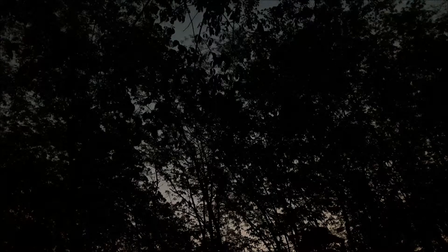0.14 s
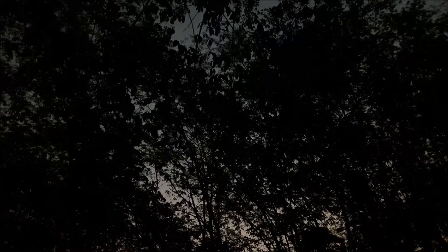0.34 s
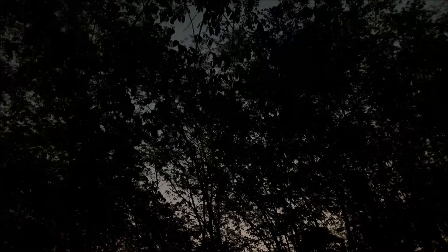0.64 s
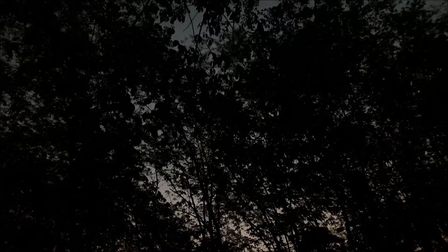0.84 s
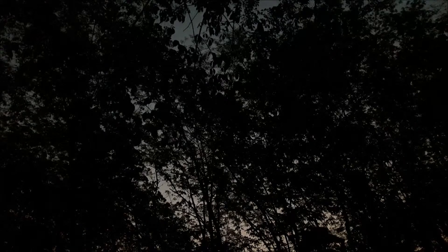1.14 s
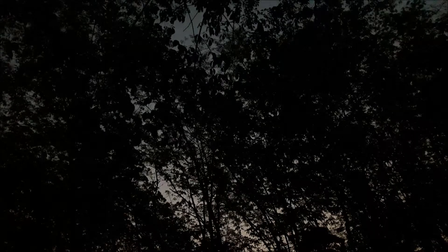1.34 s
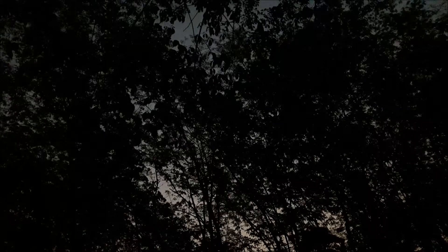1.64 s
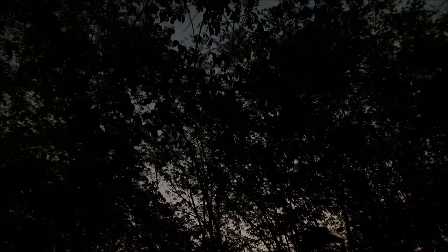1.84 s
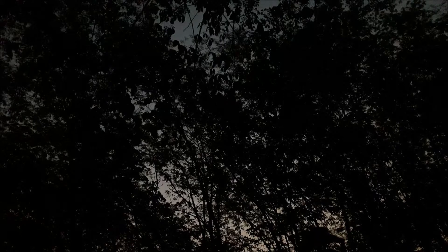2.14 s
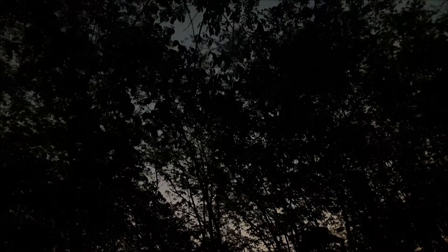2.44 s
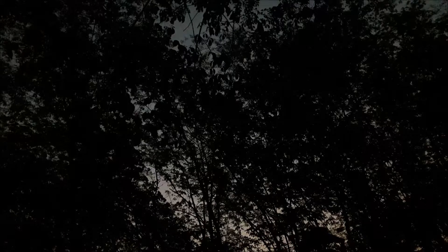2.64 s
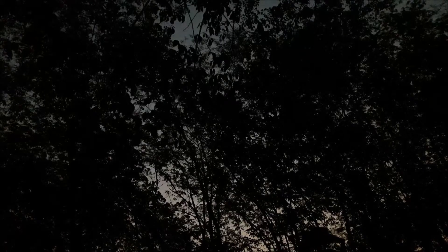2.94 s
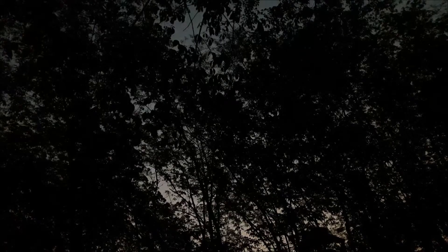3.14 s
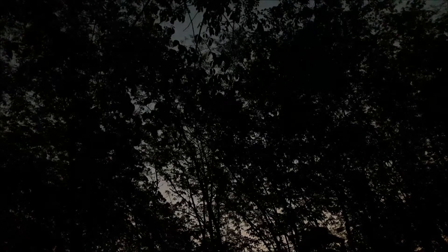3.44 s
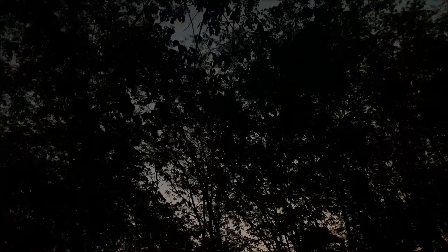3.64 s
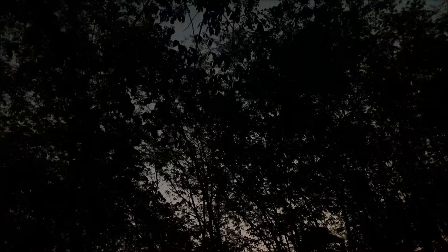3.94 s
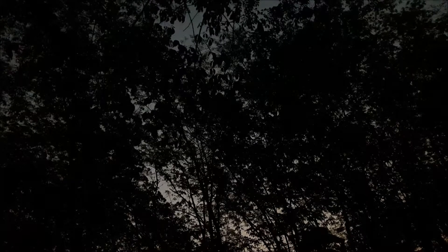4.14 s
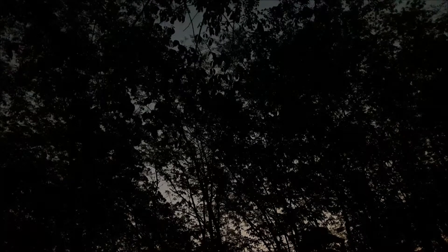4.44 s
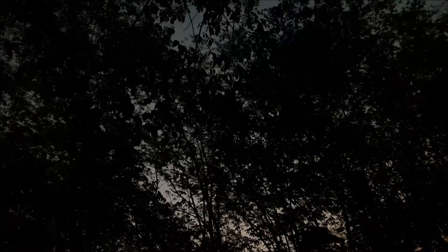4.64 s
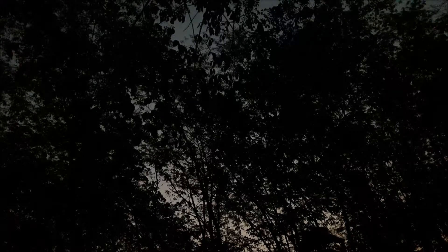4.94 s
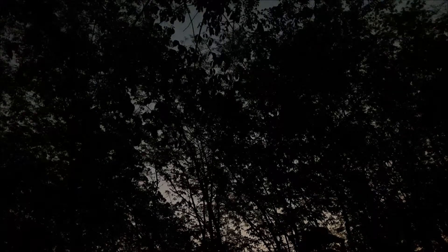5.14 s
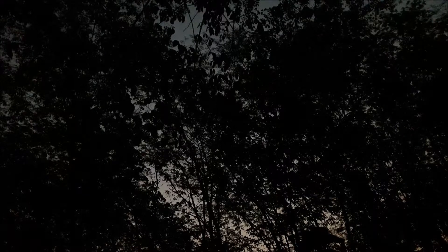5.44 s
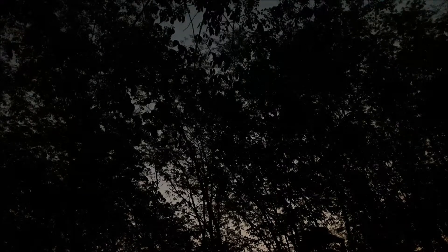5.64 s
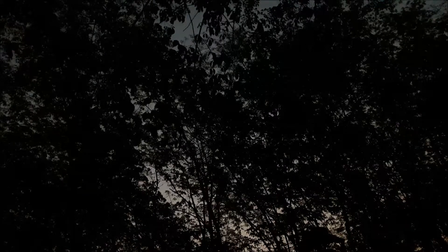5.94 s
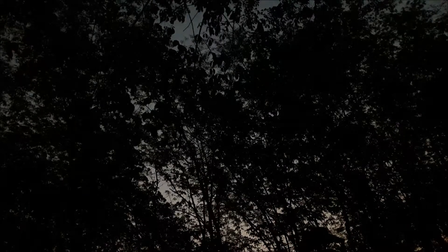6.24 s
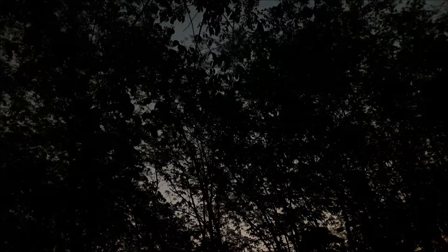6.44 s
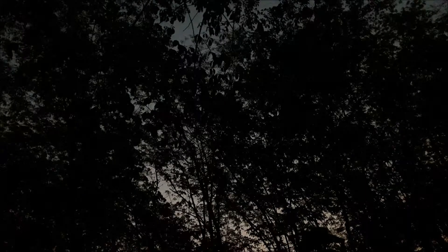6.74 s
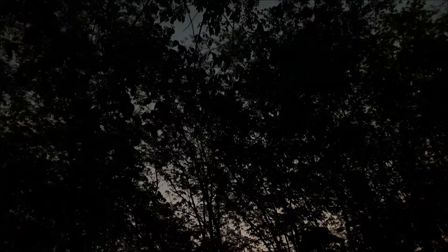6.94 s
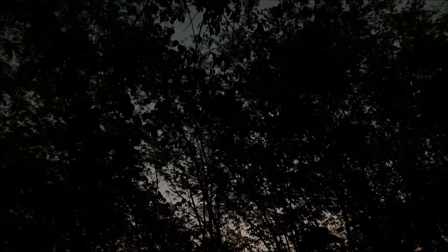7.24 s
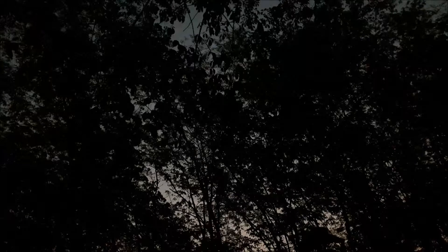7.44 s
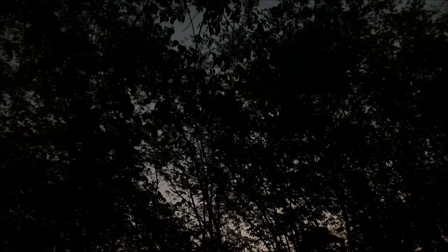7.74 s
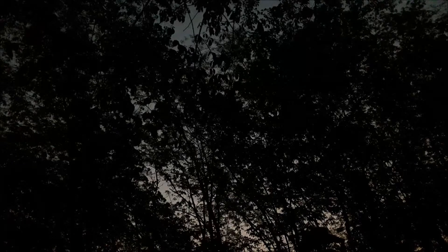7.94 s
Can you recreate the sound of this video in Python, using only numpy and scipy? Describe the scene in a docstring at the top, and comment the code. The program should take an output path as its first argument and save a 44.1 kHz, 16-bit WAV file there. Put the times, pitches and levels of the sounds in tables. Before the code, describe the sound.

One microphone among dark trees hears a treetop koel repeat a smooth rising whistle five times, each ending in a quick fall and a soft, scattered echo. Thin, dense insect hiss and faint low rumble continue throughout, with a far engine throbbing at first, then droning. Small dry ticks snap nearby; after the last call a blurred distant cock crow fades and light rustles brush past.

```python
"""In a forest at dawn a koel calls five times from a treetop: a near-pure whistle that dips, climbs and falls.
Each call is a gliding sine with faint overtones; decaying noise echoes stand for scattering trunks and leaves.
Far off, a cock crows and another bird whistles as gliding tones, mostly echo, and an engine drones at low pitch.
Filtered noise makes the steady insect hiss and the air of the place.
Close to the one microphone, short noise bursts make a few ticks and soft rustles."""
import sys
import numpy as np
from scipy import signal
from scipy.fft import rfft, irfft
from scipy.io import wavfile
from scipy.ndimage import uniform_filter1d

SR = 44100
rng = np.random.default_rng(int(sys.argv[2]) if len(sys.argv) > 2 else 0)


def log_audio(samples):
    """Write samples as a 16-bit WAV file to the path given in sys.argv[1]."""
    # one column per channel
    frames = np.atleast_2d(samples).T
    # limit to full scale, then quantise
    limited = np.clip(frames, -1, 1)
    pcm = np.round(limited * 32767).astype(np.int16)
    wavfile.write(sys.argv[1], SR, pcm)


N = 357210
TIME = np.arange(N) / SR

# the koel's calls, before their way to the microphone: (start [s], attack time constant [s],
# climb begins after [s], fall begins after [s], low note [Hz], high note [Hz], level [dB], overtone boost [dB])
KOEL_CALLS = [(0.446, 0.052, 0.14, 0.39, 1308, 1640, -30, 1),
              (1.636, 0.032, .120, .376, 1361, 1662, -29.5, 3),
              (3.008, 0.036, 0.14, 0.39, 1302, 1644, -30.5, 3.5),
              (4.487, 0.061, .143, .396, 1313, 1653, -30.5, 3),
              (5.827, 0.046, .125, .382, 1338, 1654, -29.5, 3.5)]
# the whistle's overtones, before any boost: (multiple of the pitch, on the low note [dB], on the high note [dB])
KOEL_OVERTONES = [(2, -44, -33), (3, -54, -47.5), (4, -49, -42), (5, -41, -51.5), (6, -64.5, -61.5),
                  (7, -59.5, -50), (8, -66, -64.5), (9, -64.5, -59)]
# breathy edge at the start of each call: (frequency [Hz], relative density [dB per Hz])
CATCH_COLOUR = [(1000, -26), (1300, 4), (1750, -4), (2000, -15.5), (2750, -18), (3000, -39.5)]
# ground and branch paths that add up at some pitches and cancel at others: (frequency [Hz], gain [dB])
PATH_RESPONSE = [(800, 1), (1050, 0.5), (1130, 4), (1215, -7.5), (1300, -1.6), (1345, 3), (1420, 0.5),
                 (1540, -1), (1640, 1.6), (1800, -4.5), (16000, -7.5)]
# scattering by the forest; small leaves throw back the short waves most: (frequency [Hz], gain [dB])
FOREST_SCATTER = [(400, -4.5), (1050, 2), (1260, -2.5), (1390, -3), (1500, 2), (1620, 0.5), (3300, 6),
                  (7000, 12.5), (16000, 15.5)]
# echoes of near foliage, trunks and far trees, before scatter colours them: (level [dB], time to fall 60 dB [s])
FOREST_ECHOES = [(-6, 0.14), (-10, 1.05), (-15, 2.28)]
# dry ticks close by: (time [s], snap level [dB], level of the fizz after it [dB])
TICKS = [(1.5793, -42.5, -60.5), (3.938, -50, -69), (5.486, -70, -85), (7.072, -58, -78)]
# colour of the ticks: (frequency [Hz], relative density [dB per Hz])
TICK_COLOUR = [(1500, -24), (3000, -8), (8000, -8), (13000, -5), (16000, -4)]
# soft rustles close by: (time of peak [s], half length [s], level [dB])
RUSTLES = [(6.569, 0.034, -59), (7.1, 0.032, -67), (7.335, .035, -69), (7.505, 0.026, -62.5),
           (7.67, 0.026, -66.5), (7.978, 0.042, -57)]
# colour of the rustles: (frequency [Hz], relative density [dB per Hz])
RUSTLE_COLOUR = [(1200, -24), (3400, 0), (6000, -3), (8000, -11.5), (12000, -12.5), (16000, -18)]
# the distant cock's crow, before distance sets direct sound and echo: (time [s], pitch [Hz], level [dB])
CROW_CONTOUR = [(5.42, 682, -72), (5.56, 790, -80), (5.63, 867, -63.5), (5.75, 856, -70),
                (5.98, 816, -70.5), (6.4, 777, -75), (6.65, 809, -69), (6.8, 742, -91)]
# partials of the crow: (multiple of the pitch, relative level [dB])
CROW_PARTIALS = [(1, 5.5), (2, 6), (3, -3), (4, -6.5)]
# a far bird's falling whistles, before distance: (start [s], level at the peak [dB])
FAR_WHISTLES = [(0, -61), (1.389, -63), (2.821, -63.5), (4.32, -64.5), (5.83, -61.5)]
# loudness of the far engine, before throb and fading: (time [s], level [dB])
ENGINE_LEVEL = [(0, -60.5), (.6, -57.5), (2.1, -49.5), (3.1, -53), (4.1, -53), (5.4, -52), (6, -53),
                (6.6, -48.5), (8.1, -49.5)]
# colour of the air and far woodland: (frequency [Hz], relative density [dB per Hz])
AIR_COLOUR = [(25, -86.5), (38, -86), (54, -60.5), (80, -63.5), (140, -58.5), (220, -62.5), (350, -67.5),
              (520, -75.5), (1050, -77.5), (1700, -84.5), (2700, -90.5), (5000, -96), (8000, -104),
              (10000, -103), (11500, -99), (16000, -99)]
# colour of the insect chorus: (frequency [Hz], relative density [dB per Hz])
INSECT_COLOUR = [(3000, -33.5), (3600, -14), (4100, -0.5), (4600, -4.5), (5050, -8), (5450, 1), (6050, 3.5),
                 (6250, -14), (7000, -19.5), (7800, -34.5)]
# swell of the background: (time [s], distant rumble [dB], insect chorus [dB], far woodland sounds [dB])
BACKGROUND_SWELL = [(0, -1, -1, 0), (2, -0.5, 1, 1.5), (4, -2, 0, 1), (6, 0, 1, 1), (8.1, 1, -0.5, -2)]

# the pitches between which the overtones shift from their low-note to their high-note levels
LOW_NOTE_HZ, HIGH_NOTE_HZ = 1493, 1636
RELAX_DB_PER_HZ = -0.046  # the overtones weaken as the pitch falls from the top
# every call flicks up, sags onto the low note, climbs to the high note and falls away
FLICK_HZ, FLICK_S = 109.5, .006
SAG_HZ, SAG_S = 134.7, .115
CLIMB_S = .21
# the fall is a quick swoop on top of a steady slide
FALL_HZ, HALF_FALL_S, SLIDE_HZ_PER_S = 519.6, .094, 1700
# the note fades ever faster during the fall
RELEASE_S, RELEASE_DB, RELEASE_POWER = 0.19, -34.5, 3.38
ENGINE_HZ = 110.6
# the drone's regular throb dies away
THROB_HZ, THROB_PEAK_S, THROB_DEPTH, THROB_FADE_S = 4.4, 0.3, 0.97, 2.5
AIR_DB, INSECTS_DB = -50, -59.5  # rms levels before the swell
TOP_HZ = 15750


def koel(voice_db=0.43, earlier_s=1.227, earlier_db=-1):
    """Five calls, direct and scattered; the tail of an earlier call still hangs in the trees."""
    lead = 2 * SR  # room for the earlier call, before time zero
    first_s, *shape, first_db, bright_db = KOEL_CALLS[0]
    earlier = (first_s - earlier_s, *shape, first_db + earlier_db, bright_db)
    calls = np.pad(catches(), (lead, 0))
    for s, *call in [earlier, *KOEL_CALLS]:
        tone = whistle(*call)
        start = lead + int(s * SR)
        calls[start:start + len(tone)] += tone
    direct = undb(voice_db) * colour(calls[lead:], PATH_RESPONSE)
    echo = signal.fftconvolve(calls, forest())[lead:lead + N]
    return direct + echo


def whistle(attack_s, climb_s, fall_s, low_hz, high_hz, db, bright_db, waver=0.0015, flutter_db=0.39,
            rasp=.007, edge_db=9, edge_s=0.027):
    """A clean sine with faint, slightly rasping overtones that shift as the bird presses up to the high note."""
    t = np.arange(0, fall_s + RELEASE_S, 1 / SR)
    hz = contour(t, climb_s, fall_s, low_hz, high_hz)
    release = np.maximum(t - fall_s, 0) / RELEASE_S
    envelope = (1 - np.exp(-t / attack_s)) * undb(db + RELEASE_DB * release ** RELEASE_POWER)
    phase = 2 * np.pi * np.cumsum(hz * (1 + waver * walk(250, len(t)))) / SR
    rough_phase = phase + 2 * np.pi * np.cumsum(hz * rasp * walk(1500, len(t))) / SR
    effort = np.clip((hz - LOW_NOTE_HZ) / (HIGH_NOTE_HZ - LOW_NOTE_HZ), 0, 1)
    # the tone turns purer as it falls from the top
    fallen_hz = (t > fall_s) * (high_hz - hz)
    brightness = bright_db + RELAX_DB_PER_HZ * fallen_hz
    brightness += edge_db * np.exp(-t / edge_s)  # the note starts with a hard edge
    tone = np.sin(phase)
    for k, low_db, high_db in KOEL_OVERTONES:
        overtone_db = low_db + effort * (high_db - low_db) + brightness
        tone += undb(overtone_db) * np.sin(round(k) * rough_phase)
    return np.sqrt(2) * tone * envelope * undb(flutter_db * walk(82, len(t)))


def contour(t, climb_s, fall_s, low_hz, high_hz):
    """Pitch of one call, t seconds after its start: flick, sag, climb and fall."""
    settle = SAG_HZ * np.maximum(1 - t / SAG_S, 0) ** 2 - FLICK_HZ * np.exp(-t / FLICK_S)
    climb = np.sin(np.pi / 2 * np.clip((t - climb_s) / CLIMB_S, 0, 1)) ** 2
    falling = np.maximum(t - fall_s, 0)
    swoop = FALL_HZ * falling ** 2 / (falling ** 2 + HALF_FALL_S ** 2)
    drop = swoop + SLIDE_HZ_PER_S * falling
    return low_hz + settle + (high_hz - low_hz) * climb - drop


def catches(catch_db=-52, catch_s=.011):
    """The voice catches with a brief rasp of noise before each whistle settles."""
    envelope = sum(np.exp(-((TIME - s - catch_s) / catch_s) ** 2) for s, *_ in KOEL_CALLS)
    return undb(catch_db) * envelope * noise(CATCH_COLOUR)


def forest(build_s=0.024):
    """Echo response of leaves and trunks: noise that builds up, then dies away at three rates."""
    t = TIME[:2 * SR]
    echoes = 0
    for db, t60 in FOREST_ECHOES:
        tail = rng.standard_normal(len(t)) * undb(-60 * t / t60) * (1 - np.exp(-t / build_s))
        echoes = echoes + undb(db) * tail / np.sqrt(np.sum(tail ** 2))
    return colour(np.pad(echoes, (0, SR)), FOREST_SCATTER)[:len(t)]


def ticks(snap_s=0.0014, fizz_s=0.077):
    """Close by, each tick is a snap of noise with a short bright fizz behind it."""
    envelope = 0
    for s, snap_db, fizz_db in TICKS:
        age = np.maximum(TIME - s, 0)
        snap = undb(snap_db) * np.exp(-age / snap_s)
        fizz = undb(fizz_db) * np.exp(-age / fizz_s)
        envelope = envelope + (TIME > s) * (snap + fizz)
    return envelope * noise(TICK_COLOUR)


def rustles(grain_db=3):
    """Short brushing sounds close by: swells of noise whose level varies in fine grains."""
    envelope = sum(undb(db) * np.exp(-((TIME - s) / half) ** 2) for s, half, db in RUSTLES)
    return envelope * undb(grain_db * walk(270)) * noise(RUSTLE_COLOUR)


def far_birds(direct_db=-10, echo_db=7):
    """Birds deep in the forest arrive mostly as echo."""
    cries = far_crow() + far_whistles()
    return undb(direct_db) * cries + undb(echo_db) * signal.fftconvolve(cries, forest())[:N]


def far_crow(waver=.008, hoarse=.05, break_s=5.85):
    """One long crow of a few partials; after its peak the pitch shakes more and it turns hoarse."""
    hz, db = curves(CROW_CONTOUR, TIME)
    unsteady = waver + hoarse * (TIME > break_s)
    phase = 2 * np.pi * np.cumsum(hz * (1 + unsteady * walk(160))) / SR
    sounding = (TIME > CROW_CONTOUR[0][0]) & (TIME < CROW_CONTOUR[-1][0])
    partials = sum(undb(d) * np.sin(round(k) * phase) for k, d in CROW_PARTIALS)
    return sounding * undb(db) * partials


def far_whistles(start_hz=1130, end_hz=970, length_s=.22):
    """Short sine whistles that slide downwards."""
    out = 0
    for s, db in FAR_WHISTLES:
        progress = np.clip((TIME - s) / length_s, 0, 1)
        phase = 2 * np.pi * np.cumsum(start_hz + progress * (end_hz - start_hz)) / SR
        out = out + undb(db) * np.sin(np.pi * progress) * np.sin(phase)
    return out


def engine(drift=0.0049, fading=0.36, second_db=-18):
    """A low, throbbing drone and its octave that fade in and out on their long way through the air."""
    db, = curves(ENGINE_LEVEL, TIME)
    turn = np.exp(2j * np.pi * np.cumsum(ENGINE_HZ * (1 + drift * walk(1.5))) / SR)
    depth = THROB_DEPTH * np.exp(-TIME / THROB_FADE_S)
    throb = 1 + depth * np.cos(2 * np.pi * THROB_HZ * (TIME - THROB_PEAK_S))
    first = turn * (throb + fading * (walk(12) + 1j * walk(15)))
    second = undb(second_db) * turn ** 2 * (walk(10) + 1j * walk(10))
    return np.sqrt(2) * undb(db) * (first + second).real


def background(flicker_db=1.2, shimmer_db=0.5):
    """Distant rumble and far woodland noise under the dense hiss of countless insects."""
    rumble_db, chorus_db, woods_db = curves(BACKGROUND_SWELL, TIME)
    air = noise(AIR_COLOUR) * undb(AIR_DB)
    low = signal.sosfiltfilt(signal.butter(2, 500, fs=SR, output="sos"), air)
    high = signal.sosfiltfilt(signal.butter(2, 3000, "high", fs=SR, output="sos"), air)
    rumble = low * undb(rumble_db + flicker_db * walk(7.1))
    woods = (air - low - high) * undb(woods_db)
    insects = noise(INSECT_COLOUR) * undb(INSECTS_DB + chorus_db + shimmer_db * walk(130))
    return rumble + woods + high + insects


def undb(db):
    """Decibels to gain."""
    return 10 ** (np.asarray(db) / 20)


def curves(table, t):
    """The columns of a table, joined by straight lines in time."""
    s, *columns = np.transpose(table)
    return [np.interp(t, s, c) for c in columns]


def colour(x, spectrum):
    """Filter by a table of (frequency [Hz], gain [dB]), silent outside its range."""
    hz, db = np.transpose(spectrum)
    bins = np.maximum(np.fft.rfftfreq(len(x), 1 / SR), 1)
    gain = undb(np.interp(np.log(bins), np.log(hz), db, -200, -200))
    return irfft(rfft(x) * gain, len(x))


def noise(spectrum):
    """Noise of rms 1 with the given colour."""
    y = colour(rng.standard_normal(N), spectrum)
    return y / y.std()


def walk(rate, size=N):
    """Smooth chance with a spread of 1, changing about rate times a second."""
    k = max(int(SR / rate), 1)
    steps = np.repeat(rng.standard_normal(size // k + 1), k)
    y = uniform_filter1d(uniform_filter1d(steps, k), k)[:size]
    return y / y.std()


def scene():
    """All sources, near and far, at one microphone."""
    near = koel() + ticks() + rustles()
    far = far_birds() + engine() + background()
    return (near + far)[None]


def record(dry):
    """The recorder cuts the top with a steep low-pass."""
    return signal.sosfilt(signal.ellip(10, .1, 70, TOP_HZ, fs=SR, output="sos"), dry)


dry = scene()
out = record(dry)
log_audio(out)
```